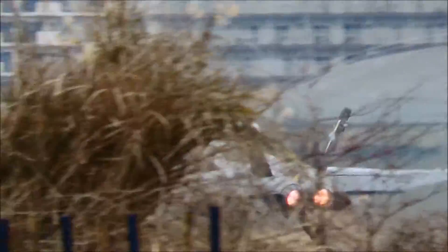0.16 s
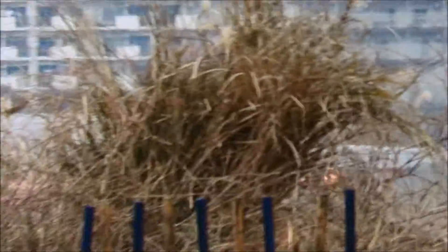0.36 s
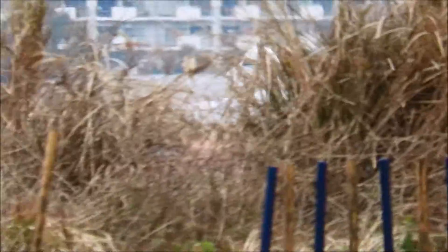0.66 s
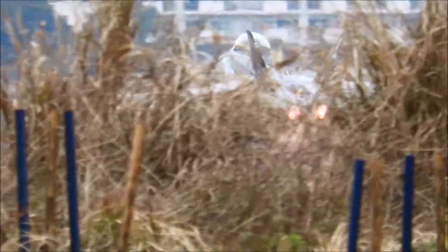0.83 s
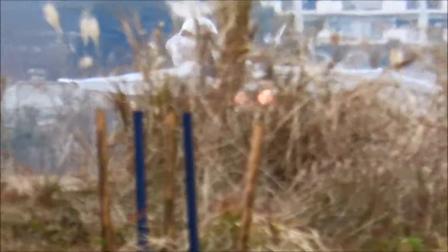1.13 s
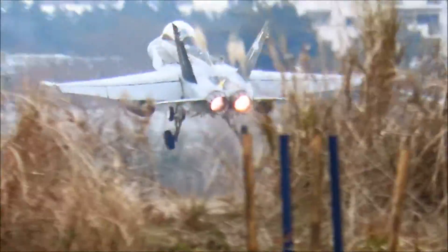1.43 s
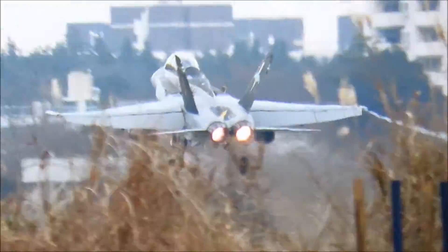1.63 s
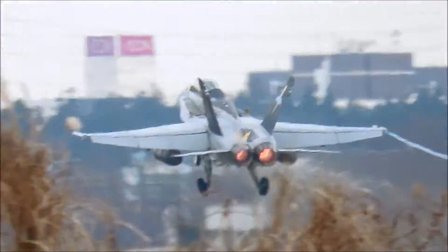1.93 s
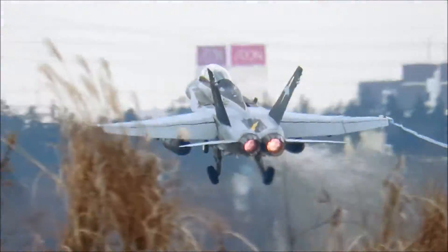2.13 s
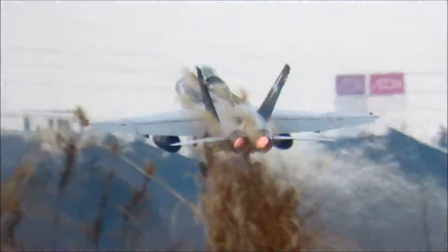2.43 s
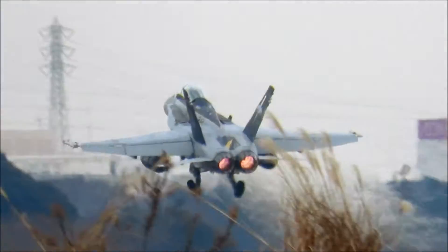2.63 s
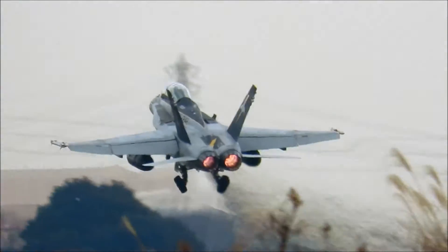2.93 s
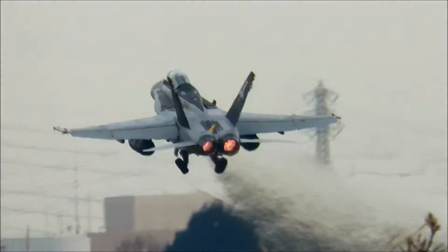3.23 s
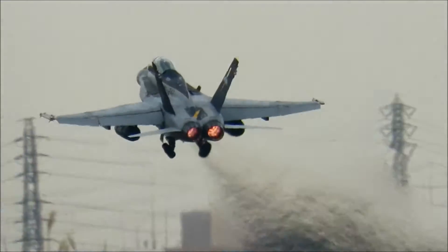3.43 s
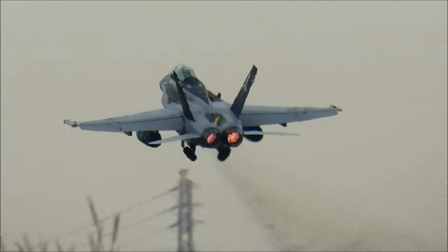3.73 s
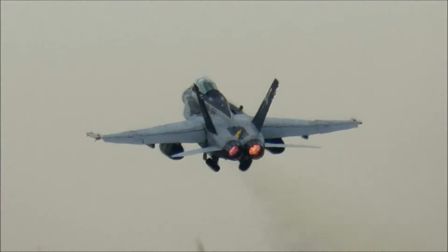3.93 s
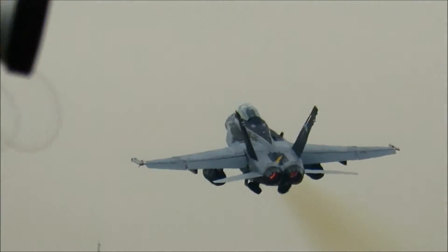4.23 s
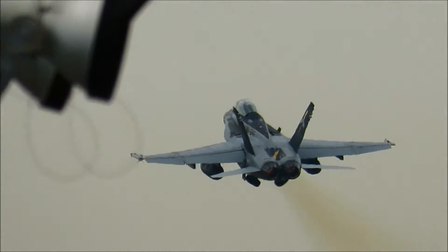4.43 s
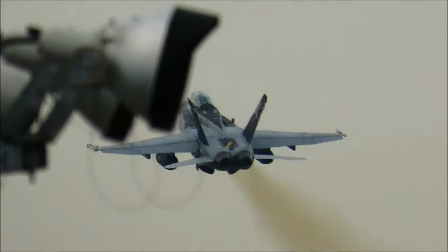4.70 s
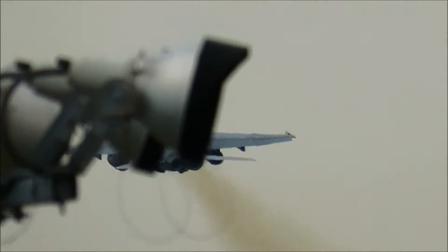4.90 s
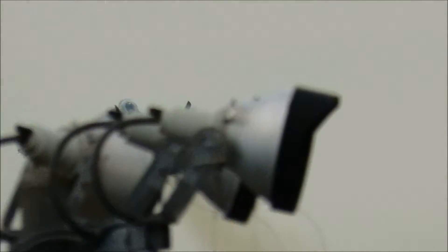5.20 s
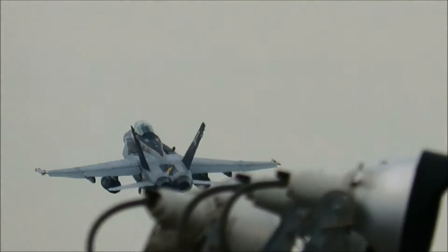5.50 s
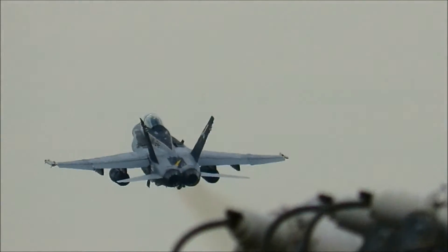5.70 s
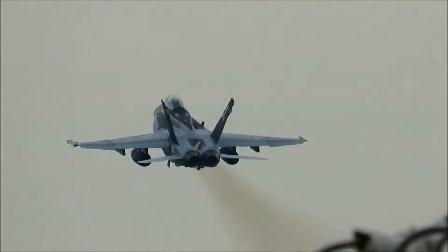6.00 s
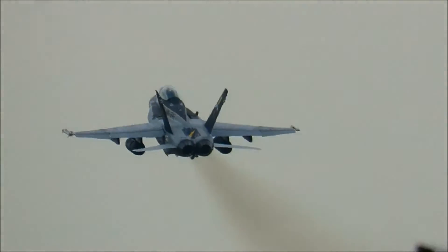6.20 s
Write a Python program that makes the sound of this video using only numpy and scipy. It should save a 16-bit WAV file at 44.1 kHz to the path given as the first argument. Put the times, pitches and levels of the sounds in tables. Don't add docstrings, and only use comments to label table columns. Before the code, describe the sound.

A twin-engined fighter jet climbs away at full afterburner, its roar swelling and tearing with sharp crackles in gusty open air.

```python
import sys
import numpy as np
from scipy import signal
from scipy.fft import rfft, irfft, next_fast_len
from scipy.io import wavfile
from scipy.ndimage import uniform_filter1d, minimum_filter1d

SR = 44100
rng = np.random.default_rng(int(sys.argv[2]) if len(sys.argv) > 2 else 0)


def wav_out(sig):
    wavfile.write(sys.argv[1], SR, np.round(np.clip(np.atleast_2d(sig).T, -1, 1) * 32767).astype(np.int16))


def invert_db(x):
    u = np.asarray(x, float) / 20
    return 10 ** u


N = 280035

PADDED = next_fast_len(N + 8192, True)
HZ = np.arange(PADDED // 2 + 1) * SR / PADDED
T = np.arange(N) / SR
SLOW = T[::64]

# [t/s, roar level/dB, treble over roar/dB, clearness of the air/dB]
CLIMB = [(0.0, -25, -6.5, -65.5), (0.58, -22, -9.5, -62.5), (0.87, -22.5, -10, -64),
         (1.54, -23.5, -10, -63), (2.05, -19.5, -7.5, -58.5), (2.25, -24, -7, -60),
         (2.51, -27.5, -3.5, -65.5), (2.79, -30.5, -4.5, -67.5), (3.11, -22, -8, -67.5),
         (3.38, -28, -6, -69.5), (3.54, -26, -7.5, -67.5), (4.32, -23.5, -3.5, -62.5),
         (4.67, -20.5, -7.5, -64), (5.02, -18, -6.5, -61.5), (5.27, -25, -8.5, -68), (5.82, -27, -5.5, -72),
         (6.14, -24, -5.5, -74), (6.35, -21.5, 3, -66)]
# [f/Hz, level/dB per Hz]
ROAR_TONE = [(28, -35), (40, -15.5), (80, 0.5), (110, -6), (150, -14.5), (210, -11.5), (300, -3.5),
             (700, 0.5), (950, -1.5), (1400, -9), (2400, -22.5), (3200, -35), (4500, -53.5), (9000, -80)]
# [f/Hz, share 0-1]
STEEPNESS = [(200, .2), (700, 0.52), (2000, 0.62), (5000, 1.0)]
# [t/s, level/dB]
RUMBLE = [(0, -34.5), (.6, -35), (1.4, -37.5), (2.2, -37.5), (3.2, -39), (3.7, -39.5), (4.1, -28.5),
          (4.4, -35.5), (4.8, -32), (5.3, -39), (5.9, -41.5), (6.35, -34)]
# [t/s, left minus right/dB]
SWING = [(0.0, -6.5), (1.29, -4.5), (1.57, -4), (1.84, -4.5), (2.92, -3.5), (3.09, -5.5), (4.58, -2.5),
         (4.88, -5), (6.35, -3.5)]
# [f/Hz, likeness 0-1, left minus right/dB, left lead/rad]
MICROPHONES = [(30, .995, 0.7, .01), (55, 1, 2, .04), (89, 1, 2, -.2), (139, 1, 3, -1.2),
               (200, 0.8, -1, 0.76), (300, 0.75, 4.5, -.7), (487, 0.42, -2.5, -0.3), (806, 0.33, 0, 0.078),
               (1380, 0.33, 3, 0.083), (2180, .6, -3, 1.1), (2840, 1, 2.5, 1.1), (3560, .6, 2, 0.9),
               (4600, 0.3, 4, 0.98), (6500, 0.3, 12, 0.93), (10000, 0.3, 3.5, 0.41)]
SWELL_WEIGHTS = ((1, 0, 0, 0, 0, 0), (0, 1, 1, 0, 0, -.5), (0, 0, 0, 1, 0, 0), (0, 0, 0, 0, 1, 1.5))
SWELL_HZ = (110, 280, 600, 1300, 4500, 9000)
# [t/s, lift/dB]
HEIGHT = [(0, -2.5), (.3, -1), (.6, -4), (1.5, 1), (1.9, 1), (2.15, -1.5), (2.35, 13), (2.65, 1.5),
          (3.2, -1.5), (3.45, 3), (3.7, 3), (4.15, 3.5), (4.6, 0.5), (4.9, 3.5), (5.12, 1.5), (5.35, -1),
          (5.65, -1.5), (6.35, 0.5)]
# [t/s, width/s, lift/dB]
SURGES = [(0.52, .05, 2), (1.12, 0.11, 1), (1.754, 0.036, 3), (2.16, 0.082, 3), (2.7, 0.017, 2),
          (4.4, 0.046, 5), (4.5, 0.055, 2), (1.1, 0.021, 1), (2.5, 0.12, -2), (3.6, 0.089, 0),
          (2.36, 0.074, -2), (6.2, 0.018, 4), (6.3, .06, 0.5), (0.59, 0.029, 0.5)]
# [t/s, width/s, centre
# f/Hz, lift/dB]
EDDIES = [(0.05, 0.07, 200.0, -5), (1.0, 0.089, 201, -2), (1.4, 0.086, 800.0, 2.5),
          (1.5, 0.08, 320.0, -1.5), (1.5, 0.08, 1570, 3.5), (1.7, 0.08, 201, -2.5), (1.95, 0.1, 251, 4),
          (2.15, 0.049, 1010.0, 0.5), (2.25, 0.08, 200.0, 5.5), (2.35, 0.063, 1600.0, 4.5),
          (2.85, 0.092, 200.0, 6), (2.9, 0.08, 1600.0, 6), (2.9, 0.08, 3220, 2.5), (3.25, 0.08, 3200.0, 2),
          (3.45, 0.095, 200.0, -4), (3.75, 0.091, 200.0, -4), (3.8, 0.11, 2000, 3), (3.95, 0.08, 320.0, 0),
          (4.05, 0.067, 804, -1), (4.5, 0.068, 200.0, 5), (4.8, 0.058, 400.0, -5.5),
          (4.8, 0.059, 3170, 6.5), (5.05, 0.08, 250.0, -7.5), (5.05, 0.08, 805, -4), (5.25, 0.11, 406, 6.5),
          (5.5, 0.08, 400.0, -6.5), (5.55, 0.073, 199, 6), (5.8, 0.11, 200.0, 7.5), (6.15, 0.08, 201, 4),
          (6.2, 0.056, 2000, 3),
          (.55, .05, 800, 2.5), (1.04, .05, 700, -1), (1.16, .04, 697, 3.5), (1.76, 0.058, 700, 2),
         (2.0, 0.066, 1300, 1.5), (2.18, 0.041, 850, 2), (3.17, .08, 446, -1.5), (3.66, 0.076, 550, 3),
         (4.44, .06, 905, -1.5), (4.65, 0.097, 740, 1.5), (4.88, 0.053, 278, -2.5), (5.65, .07, 550, 3.5),
         (6.3, 0.061, 1150, 1)]
# [t/s, width/s, lift/dB]
CLEARINGS = [(.15, .05, 3), (.6, .08, 5.5), (1.1, .2, -4), (2.1, 0.054, 8), (2.27, 0.062, 6),
             (2.38, .05, 7), (3.0, .06, 4), (3.18, .06, 3.5), (3.8, .3, -4), (4.88, .03, 4.5),
             (5.07, .06, 6), (5.17, .03, 7), (5.5, .2, -3)]

# [t/s, edge level/dB, body level/dB, top level/dB]
CRACKS = [(.1339, -37, -24, -62.5), (.26, -31.5, -17.5, -76), (.5131, -28.5, -12, -70),
          (.5467, -31, -3, -68), (.5697, -29, -14.5, -62), (.6154, -26.5, -11.5, -54),
          (.626, -41.5, -8.5, -65), (.667, -36, -17, -59.5), (.6743, -29, -8, -62),
          (2.148, -27.5, -9.5, -72), (2.1955, -29.5, -12.5, -62.5), (2.231, -31, -25.5, -56),
          (2.2663, -26.5, -5, -50.5), (2.297, -31, -25.5, -62.5), (2.3352, -30, -10, -60),
          (2.356, -23.5, -7.5, -52.5), (2.3736, -25.5, -6, -45.5), (2.4412, -27, -8, -59),
          (2.4594, -34.5, -17, -67), (2.9285, -33.5, -7, -70), (3.016, -34, -8.5, -70),
          (3.2209, -29.5, -6.5, -65), (4.8839, -33.5, -3.5, -65.5), (5.0589, -32.5, -18, -68.5),
          (5.111, -32, -14.5, -66), (6.2775, -36.5, -1.5, -88)]
# [t/s, edge level/dB, body level/dB]
SNAPS = [(0.0361, -33.5, -13.5), (.186, -46, -29), (.273, -42, -24), (0.347, -43, -13.5),
         (0.4402, -35.5, -9), (1.8621, -37, -7.5), (2.0319, -43, -22), (2.0777, -35.5, -11.5),
         (2.2604, -36.5, -4.5), (2.524, -43, -19.5), (2.652, -45.5, -25), (3.2654, -42.5, -8.5),
         (4.8328, -48, -0.5), (4.8476, -32, -15), (4.8918, -35, -6), (5.0006, -34, -7),
         (5.1209, -31.5, -13), (5.1674, -36, -6), (5.2, -46, -17), (5.1383, -33.5, -9),
         (5.205, -39.5, -11.5), (5.2126, -40.5, -4), (5.2203, -49, -9.5), (5.232, -42, -14),
         (5.2494, -47.5, -10.5), (5.36, -46, -10), (2.2047, -43.5, -4), (3.0897, -38.5, -7),
         (3.1974, -41.5, -12), (3.262, -48, -8), (0.5962, -45, -16), (4.957, -44.5, -5)]
# [t/s, edge level/dB, body level/dB]
THUDS = [(0.155, -47, -5), (0.1847, -43, -10.5), (0.2484, -49, -7), (0.3384, -50, -5), (0.428, -38, -7),
         (0.506, -43, -6.5), (0.5253, -40.5, -7.5), (0.5461, -58, -12), (0.6736, -59.5, -3),
         (0.689, -39, -15.5), (0.7529, -35, -9), (0.78, -50, -7), (0.791, -35, -7.5), (1.1703, -40.5, -8),
         (1.2918, -51.5, -8), (1.8011, -42, -8), (1.8404, -44, -4), (2.116, -34.5, -5.0),
         (2.142, -42.5, -2.5), (2.2662, -60, -3), (2.3094, -36, -6.5), (2.3496, -38.5, -11),
         (2.4103, -35.5, -7), (2.4418, -59.5, -7.5), (2.4598, -58.0, -9), (2.4906, -34, -6),
         (2.68, -57.5, -8.5), (2.7002, -37.5, -11), (2.7435, -45, -13), (2.8203, -49.5, -8),
         (2.838, -46, -7.5), (2.9993, -53.5, -9.5), (3.116, -43.5, -8.5), (3.1221, -32.5, -2),
         (3.1379, -34, -11), (3.1788, -43, -5.5), (3.2692, -45, -10), (3.2985, -41.5, -10),
         (3.3932, -45, -9), (3.4754, -50.5, -10), (3.6406, -50, -9.5), (3.6761, -48, -9),
         (4.38, -38.5, -7.5), (4.4095, -39.5, -7.5), (4.9817, -38, -3.5), (5.0469, -40, -6.5),
         (5.1355, -33.5, -2.5), (5.1971, -59.5, -5.0), (5.2335, -41.5, -8.5), (5.274, -37.5, -8),
         (5.3099, -51, -10), (5.3847, -47, -11.5), (5.436, -44, -9), (5.4408, -46, -13), (5.456, -44.5, -8),
         (5.5932, -41.5, -6.5), (5.7934, -45, -10), (5.8932, -52.5, -13.5), (6.1526, -48.5, -10.5),
         (6.1854, -58, -8.5)]
# [t/s, edge level/dB, body level/dB]
TICKS = [(0.468, -38, -19.5), (0.48, -38, -16.5), (.517, -35, -21), (0.5653, -36, -16.5), (0.729, -41, -16),
         (.9612, -43.5, -17), (0.994, -41.5, -14), (1.0364, -41, -12), (1.0999, -43.5, -16),
         (1.922, -39, -13), (3.0637, -41, -14.5), (3.8692, -45, -15), (3.9564, -41, -12),
         (4.1154, -42.5, -13.5), (4.7854, -39, -14), (4.801, -36.5, -10), (4.817, -35.5, -9.5),
         (4.8657, -34.5, -9), (4.8746, -36, -9), (5.0225, -37.5, -11.5), (5.1842, -40.5, -16),
         (5.415, -45.5, -18), (5.62, -51, -15.5)]
# [start t/s, length/s, edge level/dB, body level/dB]
SHOWERS = [
    (.1, 0.32, -39.5, -16),
    (.48, .32, -43.5, -23),
    (.85, 0.62, -48.5, -28.5),
    (1.95, .25, -41, -21),
    (2.2, 0.27, -41, -25.5),
    (2.8, .7, -52.5, -22),
    (3.6, 0.45, -60.5, -17.5),
    (4.78, 0.15, -45, -16.5),
    (5.0, .22, -45.5, -15.5),
    (5.22, 0.6, -53, -16),
]
# [f/Hz, level/dB]
BODY_TONE = [(100, -15.5), (450, 14.0), (900, 14.0), (1400, 8.5),
             (2200, -1), (3300, -12.5), (5000, -57.5), (8000, -94.5)]
EDGE_TONE = [(500, 4.0), (2000, 16), (3200, 6.5), (4800, -11), (6500, -24), (8500, -42), (12000, -85.5)]
TOP_TONE = [(5500, -30), (7500, -3), (9000, -7), (10500, -11.5), (12500, -21.5), (14500, -64.5)]

# [t/s, level/dB]
SHUTTER = [
    (5.6824, -52),
]
# [f/Hz, level/dB]
SHUTTER_TONE = [(2000, -32.0), (5000, 2), (7500, -5.0), (10500, -8), (13000, -25.0)]
# [t/s, level/dB]
HISS = [(.05, -101), (.45, -89.5), (1.29, -87.5), (1.7, -84.5), (2.0, -90.5), (2.45, -91), (2.75, -94),
        (3.05, -88.5), (3.8, -84), (4.1, -82), (4.75, -79.5), (4.9, -83), (5.2, -88.5), (5.83, -83.5),
        (6.15, -82), (6.35, -86)]
# [f/Hz, level/dB]
HISS_TONE = [(1000, 3.5), (7000, 2.7), (15000, 1.3)]


def roar():
    roar_db, treble_db, sizzle_db = curves(CLIMB)
    (rumble_db,), (pan_db,), (lift_db,) = curves(RUMBLE), curves(SWING), curves(HEIGHT)
    roar_db = roar_db + moments(SURGES)
    clear_db = moments(CLEARINGS)
    pair = exhaust()
    swells = np.array([rumble_db, roar_db, roar_db + treble_db, sizzle_db])
    swells += (roar_db.mean() - swells.mean(axis=1))[:, None]
    gust = walk(40)
    out = 0
    for step in range(18):
        hz = 26 * 2 ** (step / 2)
        octaves = np.log2((HZ + 1e-9) / hz)
        band = np.cos(np.pi / 2 * np.clip(2 * octaves, -1, 1)) ** 2
        share = np.array([along(hz, list(zip(SWELL_HZ, row))) for row in SWELL_WEIGHTS])
        above_rumble = 1 - share[0]
        db = share @ swells + above_rumble * 0.84 * gust + 0.68 * walk(12)
        db = db + lift_db * region(hz, 310, .55)
        for s, width, eddy_hz, eddy_db in EDDIES:
            db = db + moments([(s, width, eddy_db)]) * region(hz, eddy_hz, 0.35)
        db = db + clear_db * region(hz, 6000, .6)
        side_db = above_rumble * pan_db / 2
        levels = [np.interp(T, SLOW, invert_db(db + ear)) for ear in (side_db, -side_db)]
        out = out + wave(pair * band) * levels
    return out


def exhaust():
    alike = np.clip(along(HZ, MICROPHONES), 0, 1)
    steep = np.clip(along(HZ, STEEPNESS), 0, 1)
    paths = []
    for _ in range(3):
        turbulence = spec(rng.standard_normal(PADDED))
        jumps = spec(shocklets(count=9000, spread_db=2.5))
        paths.append(np.sqrt(1 - steep) * turbulence + np.sqrt(steep) * jumps)
    pair = np.sqrt(alike) * paths[0] + np.sqrt(1 - alike) * np.array(paths[1:])
    pair = pair * causal(along(HZ, ROAR_TONE)) * ports()
    heart = (HZ > 280) * (HZ < 900)
    return pair / np.std(wave(pair.mean(axis=0) * heart))


def shocklets(count, spread_db):
    when, size = rng.random((count, 2)).T
    jump_db = np.minimum(-spread_db * np.log(1 - size), 12)
    train = np.bincount((when * N).astype(int), invert_db(jump_db), N)
    return unit(train.mean() - train)


def swept():
    s = np.concatenate([np.transpose(rows)[0] for rows in (CRACKS, SNAPS, THUDS, TICKS)])
    bump = np.hanning(int(2 * .005 * SR))
    fronts = np.bincount(((s + 0.00031) * SR).astype(int), minlength=N)
    near = signal.fftconvolve(fronts, bump, mode="same")
    return 1 - .6 * np.clip(near, 0, 1)


def cracks():
    shapes = [causal(along(HZ, tone)) for tone in (BODY_TONE, EDGE_TONE, TOP_TONE)]
    s, edge_db, body_db, top_db = np.vstack([CRACKS, showers()]).T
    at = ((s - .00008) * SR).astype(int)
    levels = (body_db + 0.18 * edge_db + 5.0, edge_db + 16.5, 1.036 * top_db + 8.5)
    pan_db = -3.5 + 1.4 * rng.standard_normal(len(s))
    front = 0
    for shape, db, lead in zip(shapes, levels, (0, 0, -1)):
        trains = [np.bincount(at - lead, invert_db(db + ear * pan_db / 2), N) for ear in (1, -1)]
        front = front - shape / np.abs(irfft(shape)).max() * spec(np.array(trains))
    ground_db, ground_s = -9, .0023
    echo = invert_db(ground_db) * np.exp(-2j * np.pi * HZ * ground_s) / (1 + 1j * HZ / 2200) ** 2
    t = T[:SR // 10]
    scatter = rng.standard_normal((2, len(t))) * np.exp(-t / 0.0041)
    haze = invert_db(-22.0) * spec(scatter) * HZ / (HZ + 3000)
    return wave(front * (1 + echo + haze) * ports())


def showers(count=7):
    edge_scatter_db, body_scatter_db, top_scatter_db = -1.5, 5, 3
    s, length, edge_db, body_db = np.repeat(SHOWERS, count, axis=0).T
    s = s + length * rng.random(len(s))
    edge_db = edge_db + edge_scatter_db * rng.standard_normal(len(s))
    body_db = body_db + body_scatter_db * rng.standard_normal(len(s))
    rows = np.vstack([SNAPS, THUDS, TICKS, np.transpose([s, edge_db, body_db])])
    top_db = rows[:, 1] - 39 + top_scatter_db * rng.standard_normal(len(rows))
    return np.c_[rows, top_db]


def shutter():
    out = np.zeros((2, N))
    for s, db in SHUTTER:
        t = np.clip(T - s, 0, None)
        decay = np.exp(-t / 0.0016) + invert_db(-10.0) * np.exp(-t / 0.037)
        out += invert_db(db) * (T > s) * decay * rng.standard_normal((2, N))
    return wave(spec(out) * invert_db(along(HZ, SHUTTER_TONE)))


def amplifier_hiss():
    mid, side = wave(spec(rng.standard_normal((2, N))) * invert_db(along(HZ, HISS_TONE)))
    db = np.interp(T, *np.transpose(HISS)) + 5.0 + np.interp(T, SLOW, .7 * walk(12))
    return invert_db(db) * (mid + 1.1 * side * np.array([[1], [-1]]))


def ports():
    tilt_db, lead_rad = along(HZ, MICROPHONES, column=2), along(HZ, MICROPHONES, column=3)
    tilt = invert_db(tilt_db / 2) * np.exp(.5j * lead_rad)
    return np.array([tilt, 1 / tilt])


def limiter_gain(x):
    gain = minimum_filter1d(np.minimum(1, .72 / np.abs(x).max(axis=0)), size=601)
    for _ in range(3):
        gain = uniform_filter1d(gain, size=200)
    return gain


def moments(table):
    return sum(db * np.exp(-.5 * ((SLOW - s) / width) ** 2) for s, width, db in table)


def region(hz, centre_hz, octaves):
    return np.exp(-(np.log2(hz / centre_hz) / octaves) ** 2)


def walk(rate):
    k = int(SR / 64 / rate)
    held = np.repeat(rng.standard_normal(len(SLOW) // k + 1), k)
    return unit(uniform_filter1d(uniform_filter1d(held, k), k)[:len(SLOW)])


def curves(table):
    s, *columns = np.transpose(table)
    return [uniform_filter1d(np.interp(SLOW, s, c), size=15) for c in columns]


def along(hz, table, column=1):
    table = np.array(table)
    return np.interp(np.log(hz + 1e-9), np.log(table[:, 0]), table[:, column])


def causal(db):
    c = irfft(db * np.log(10) / 20)
    c[1:len(c) // 2] *= 2
    c[len(c) // 2 + 1:] = 0
    return np.exp(rfft(c))


def spec(x):
    return rfft(x, PADDED)


def wave(s):
    return irfft(s)[..., :N]


def unit(x):
    return x / np.sqrt(np.mean(x ** 2))


def scene():
    return roar() * swept() + cracks() + shutter()


def band_limit(x):
    return signal.sosfilt(signal.butter(12, 15700, fs=SR, output="sos"), x)


def record(dry):
    mix = dry * limiter_gain(dry) + amplifier_hiss()
    return band_limit(mix)


dry = scene()
out = record(dry)
wav_out(out)
```